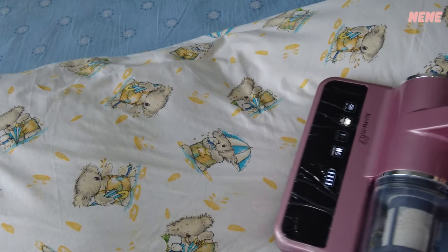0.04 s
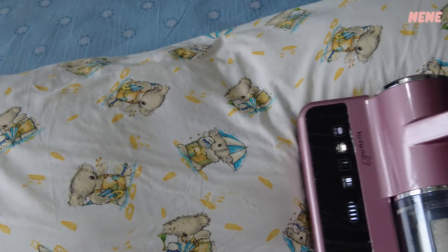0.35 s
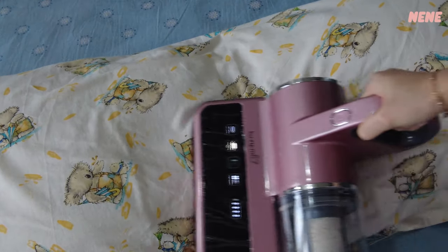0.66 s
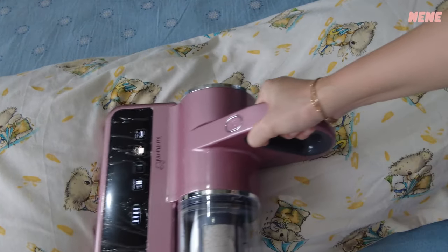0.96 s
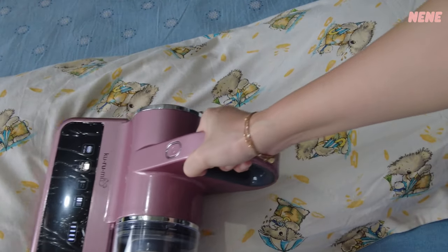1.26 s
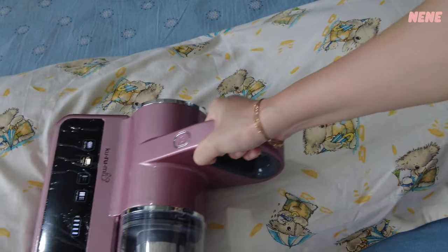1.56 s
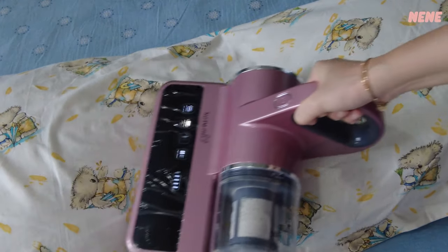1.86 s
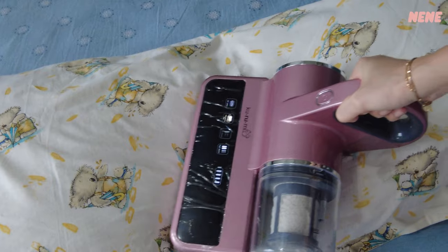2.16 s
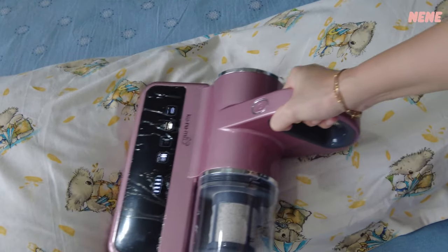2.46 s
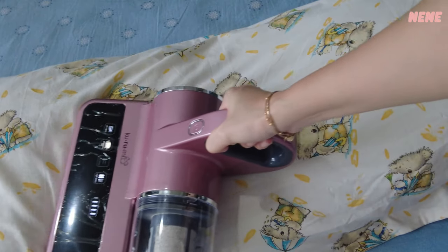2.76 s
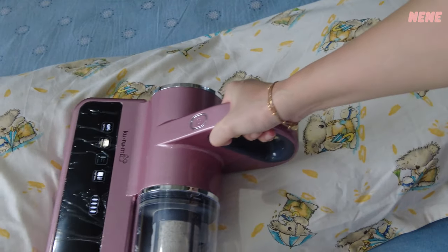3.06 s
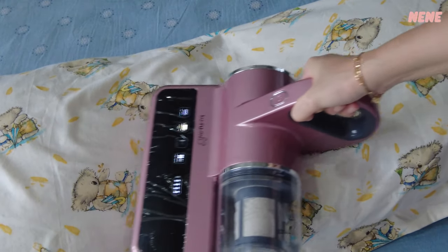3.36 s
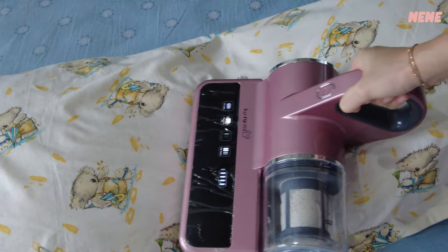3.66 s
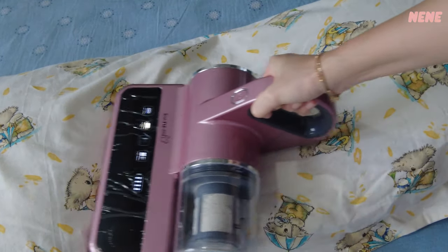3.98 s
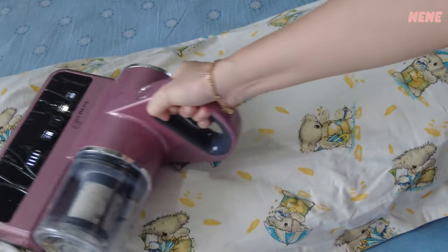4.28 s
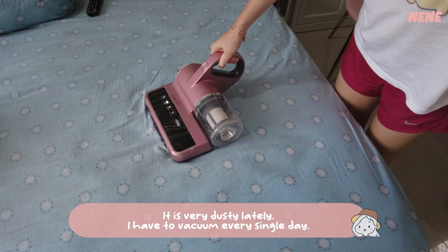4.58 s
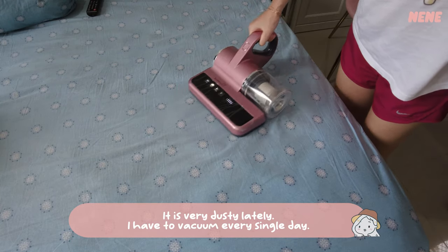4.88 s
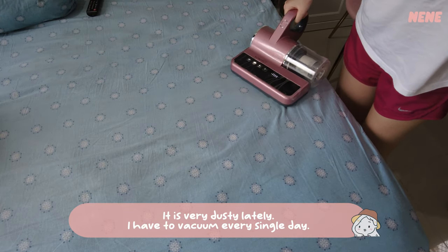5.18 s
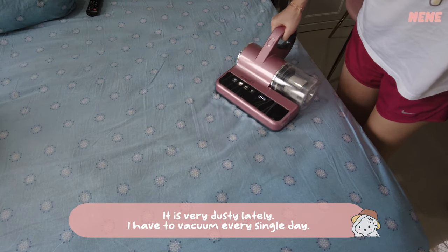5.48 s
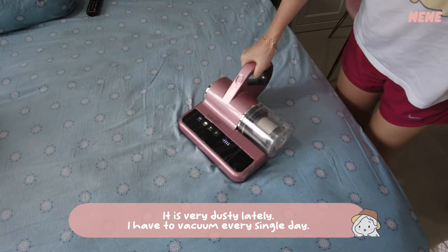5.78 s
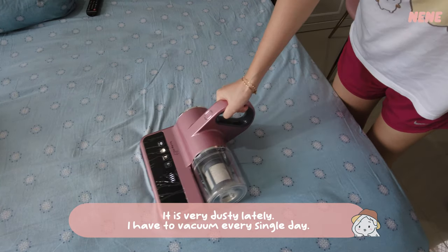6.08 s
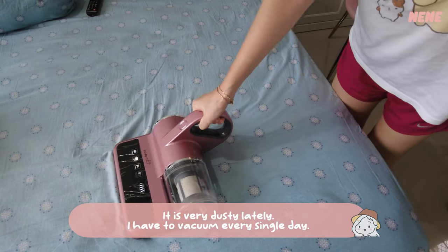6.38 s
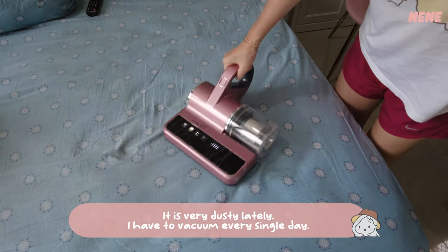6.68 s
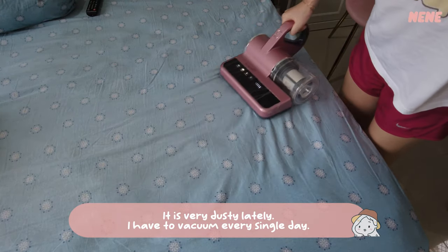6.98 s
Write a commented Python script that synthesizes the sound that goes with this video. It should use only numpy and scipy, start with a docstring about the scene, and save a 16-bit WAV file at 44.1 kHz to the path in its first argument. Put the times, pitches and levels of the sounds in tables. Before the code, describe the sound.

Indoors, air rushes through a handheld bed vacuum as it is pushed over a quilt nearby, the motor whine wavering between left and right. Then comes a sudden switch to a faster, shriller run on a bed sheet, a little quieter and more distant. The pitch rises briefly and levels off, while the hiss swells gently with the strokes and the brush thrums faintly on the mattress.

```python
"""The seven-bladed fan of a handheld bed vacuum whines at its blade-passing frequency, swelling and
fading from ear to ear as it moves through the bedroom's standing waves. The geared brush roller hums,
beats and thrums on the bedding, and air rushes through nozzle, duct and exhaust as broadband noise.
The cleaner is first pushed over a quilt close by; then the scene changes abruptly and it runs up to
a higher speed on a sheet, further off."""
import sys
import numpy as np
from scipy import signal
from scipy.fft import rfft, irfft, next_fast_len
from scipy.io import wavfile
from scipy.ndimage import uniform_filter1d, map_coordinates

SR = 44100
rng = np.random.default_rng(int(sys.argv[2]) if len(sys.argv) > 2 else 0)


def to_wav(s):
    """Save 16-bit WAV."""
    ch = np.atleast_2d(s).T  # columns
    pcm = np.round(np.clip(ch, -1, 1) * 32767)  # PCM
    wavfile.write(sys.argv[1], SR, pcm.astype(np.int16))


N = 310464
TIME_S = np.arange(N) / SR
CHANGE_S = 4.502  # from quilt to sheet
FULL_SPEED_HZ = 835  # shaft speed that the fan approaches on the sheet

# Fan shaft speed: time_s, speed_hz
SHAFT_SPEED_QUILT = [(0, 479), (1.2, 478.8), (1.95, 481.4), (4.48, 481.1)]
# Quick run-up and slow settling on the sheet: initial_deficit_hz, time_constant_s
RUN_UP = [(46, .19), (26, .85)]
# Blade tone in the standing waves: time_s, left_db, right_db, half_interaural_phase_rad
BLADE_QUILT = [(0, -41.5, -45.5, -.7), (.28, -35, -34.5, -0.7), (.45, -38.5, -38, -0.25),
               (.6, -48.5, -43.5, -.2), (.66, -52, -52, 0.2), (.78, -57, -41, -.3), (.97, -44, -50.5, 0),
               (1.04, -46.5, -48, -1.4), (1.13, -51, -53, -1.2), (1.21, -44.5, -42.5, 0.33),
               (1.47, -40, -39.5, 0), (1.62, -43, -44.5, .5), (1.68, -41.5, -52, 1.5),
               (1.78, -43, -44, 1.96), (1.87, -54, -46, 1.9), (1.98, -44, -47, 0.5), (2.1, -49, -50, 1.8),
               (2.2, -44, -50, 2), (2.38, -47, -44, 1.8), (2.45, -57, -42, 1), (2.58, -45, -41, 1.4),
               (2.7, -43, -48, 1), (2.8, -43, -53, 0), (3.1, -43.5, -48.5, .15), (3.35, -44, -49, 1.1),
               (3.46, -44, -55, 1.2), (3.58, -44.5, -45, 1.74), (3.73, -39.5, -39, 2.5),
               (3.88, -43.5, -41.5, 1.85), (3.99, -40.5, -47, 2), (4.08, -38.5, -40, 3.5),
               (4.2, -42, -37, 3.7), (4.28, -48, -40, 4.5), (4.35, -41, -43, 4.8),
               (4.47, -36.5, -51.5, 4.5)]
BLADE_SHEET = [(4.52, -49, -49, 0.3), (4.6, -49, -52, 0), (4.66, -43, -47, 0), (4.77, -46, -48, -1.3),
               (4.85, -55, -55, -0.5), (4.94, -50, -49, -0.1), (5.06, -44, -46, 0.34), (5.18, -56, -57, .2),
               (5.24, -46.5, -46.5, 0.4), (5.32, -41.5, -45, 0.23), (5.43, -54, -43.5, 0),
               (5.48, -45.5, -45.5, -.6), (5.58, -54, -51, -0.5), (5.65, -48, -48, -1.6),
               (5.71, -51, -53, -3), (5.77, -45, -42.5, -3.45), (5.83, -48, -43, -3),
               (5.875, -50, -53, -1.4), (5.94, -40, -44, -0.2), (6.02, -42, -46, 0), (6.1, -46.5, -54, 0.7),
               (6.18, -57, -47, 0.3), (6.25, -49, -46, -.5), (6.34, -55, -57, .3), (6.45, -53, -56, -0.3),
               (6.56, -50, -43.5, -.1), (6.62, -49, -48, -1), (6.7, -46.5, -52, -1), (6.77, -41.5, -49, 0),
               (6.88, -43, -44, 0.2), (6.98, -52, -50, -1.1), (7.04, -49, -44, -1)]
# Hum at the shaft frequency: time_s, relative_level_db
SHAFT_HUM_QUILT = [(0, -55), (.3, -70), (.55, -56.5), (1.4, -58), (2.05, -65), (2.45, -55), (2.75, -58),
                   (2.93, -49), (3.09, -63), (3.24, -49), (3.65, -76), (4.1, -51.5), (4.48, -63)]
# Whistle at the fifth shaft order: time_s, level_db
FIFTH_ORDER_QUILT = [(0, -74), (.6, -67), (.8, -54.5), (.98, -51), (1.15, -63), (1.42, -57), (1.7, -72),
                     (2.03, -53.5), (2.2, -57.5), (2.48, -50.5), (2.65, -56), (2.78, -63), (3.2, -62),
                     (3.56, -51.5), (3.75, -57.5), (4.13, -54), (4.48, -60)]
# Weaker shaft orders: multiple, level_db
ORDERS_QUILT = [(2, -72.5), (10, -67), (14, -77.5), (15, -81), (21, -86), (25, -88)]
# Weaker shaft orders: multiple, full_speed_level_db, growth_db_per_hz
ORDERS_SHEET = [(5, -71, .04), (10, -67.5, 0.2), (14, -78, 0.5), (15, -81, .02)]

# Noise spectra of nozzle, duct, exhaust and the gap under the nozzle: frequency_hz, relative_density_db
NOZZLE_QUILT = [(12, -22), (40, -5.5), (85, -8), (130, -12.5), (200, -7), (280, -4), (340, -2), (520, -1),
                (650, -4), (870, -18), (1200, -9), (2500, -43)]
NOZZLE_SHEET = [(12, -19), (45, 0), (95, 1.5), (120, -3.5), (175, -1), (250, -3.5), (350, -2.5), (430, -6),
                (520, -1.5), (565, -7), (625, 0), (690, -3.5), (770, -.5), (1020, 0), (1250, -4.5),
                (1600, -33)]
DUCT_QUILT = [(700, -42), (1000, -28), (1190, -9.5), (1310, -1.5), (1640, -2), (1900, -8.5), (2280, -15),
              (2480, -9.5), (3000, -7), (3300, -8.5), (3700, -20), (5000, -58)]
DUCT_SHEET = [(1900, -37), (2330, -12), (2470, -4), (2800, 2.5), (3000, -3), (3270, -3), (3340, -6),
              (3520, -8), (3750, -14.5), (4400, -44), (6000, -55)]
EXHAUST_QUILT = [(2000, -43), (3400, -16), (3850, -9), (4350, 1), (4650, -3), (5000, -6.5), (6550, -10.5),
                 (6900, -16), (7600, -15.5), (8500, -19.5), (10000, -24), (13000, -27), (15700, -29)]
EXHAUST_SHEET = [(3000, -19), (4200, -9.5), (4900, -5.5), (5600, 2.5), (6450, -2), (7050, -12), (8900, -8),
                 (9900, -13.5), (10850, -7.5), (11800, -19), (12500, -17), (13300, -28), (15000, -21),
                 (15700, -28)]
GAP_QUILT = [(550, -30), (740, 0), (1100, 0), (1400, -30)]
GAP_SHEET = [(700, -34), (1200, 1.5), (1650, 1.5), (1950, -1.5), (2300, -0.5), (3500, -37)]
# Air leaking under the nozzle on the quilt: time_s, level_db
GAP_LEVEL = [(.2, -60), (.9, -67), (1.55, -72), (1.95, -60), (2.5, -60), (2.95, -64), (3.4, -61),
             (4.48, -61)]
# Hollow lower resonance of the duct on the quilt: time_s, relative_level_db
HOLLOW_LEVEL = [(0, -45), (1.0, -43.5), (1.73, -40.5), (2.15, -44), (2.9, -45.5), (3.15, -42.5),
                (3.55, -47), (4.48, -46)]
# Rush of air on the sheet, swelling twice, loudest midway through the second stroke:
# time_s, relative_level_db
FLOW_SHEET = [(4.52, -54), (4.75, -52.5), (5.05, -53.3), (5.38, -50), (5.8, -51), (6.3, -51), (6.62, -48),
              (6.85, -52.5)]
# Likeness of the noise at the two ears: frequency_hz, correlation
COHERENCE_QUILT = [(60, 1), (130, 0.97), (290, 0.97), (640, 0.42), (1410, 0.74), (3100, 0.52), (6820, 0.32),
                   (15000, 0.85)]
COHERENCE_SHEET = [(60, 0.79), (130, 1), (290, 0.96), (640, 0.94), (1410, 0.36), (3100, 0.89), (6820, 0.34),
                   (15000, 0.61)]

# Two close gear tones of the roller drive: upper_hz, lower_hz
GEAR_HZ = [1267, 1246]
# The gear tones take turns, and growl where equally loud: time_s, upper_db, lower_db
GEAR_LEVEL = [(0, -51.5, -59), (.35, -47, -59), (.73, -43, -59), (1.0, -51, -55), (1.45, -46, -49),
              (1.7, -48.5, -55), (1.82, -58, -57), (1.97, -55, -52.5), (2.2, -49.5, -52.5),
              (2.55, -60, -50.5), (2.8, -55.5, -57), (3.03, -50.5, -56), (3.3, -59, -59),
              (3.55, -54, -51.5), (3.8, -50, -47), (3.95, -60, -48.5), (4.25, -49.5, -52.5),
              (4.48, -55, -52.5)]
# Tones of the roller and its drive (on the sheet, at full load): pitch_hz, level_db
ROLLER_QUILT = [(306.8, -64.5), (1335, -61.5), (1610, -63)]
ROLLER_SHEET = [(2159, -77), (2529, -61.5), (2767, -65), (3004, -64.5)]
# Low hum of the spinning brush: pitch_hz, level_db
BRUSH_HUM_SHEET = [(142, -65), (198, -72.5)]
# The brush beating the soft quilt: time_s, relative_level_db
PATTER_LEVEL = [(.15, -69), (.38, -55), (.95, -60.5), (1.4, -63.5), (1.7, -63), (2.1, -65), (3, -69),
                (3.45, -57.5), (3.8, -70)]
# Spectrum of that patter: frequency_hz, relative_density_db
PATTER_SPECTRUM = [(30, -33), (60, -25), (75, 9.5), (100, 6), (130, -12), (250, -53)]
# The brush drums on the mattress while it bears down: start_s, length_s, pitch_hz, level_db
THRUMS = [(4.4, 1.41, 57, -64.5), (6.17, .8, 81.4, -58.5)]
# A faint rubbing tone climbs during each stroke: start_s, length_s, start_pitch_hz, level_db
RUBS = [(5.206, 0.67, 228, -71), (6.154, 0.95, 232, -70)]


def fan(shaft_hz, blade_path, hum_db, orders, blade_trim_db, flutter):
    """Rotor harmonics: the blade-passing tone and the weaker orders are multiples of the shaft speed."""
    left_db, right_db, lead = curves(blade_path)
    blade_db = np.array([left_db, right_db]) + blade_trim_db
    whine = tone(7 * shaft_hz, blade_db, flutter, roam=0.074, lead=lead)
    whine += tone(shaft_hz, hum_db, flutter=0.29, roam=0.27)
    for multiple, db in orders:
        whine += tone(multiple * shaft_hz, db, flutter=0.18, roam=0.3, fade_db=2.6)
    return whine


def quilt_fan():
    """Beating: a faint neighbour makes the slow fan's blade tone flutter; the fifth order whistles."""
    shaft_hz, = curves(SHAFT_SPEED_QUILT)
    hum_db, = curves(SHAFT_HUM_QUILT)
    fifth_db, = curves(FIFTH_ORDER_QUILT)
    beat_hz = 16.5
    whine = fan(shaft_hz, BLADE_QUILT, hum_db - 2.5, ORDERS_QUILT, blade_trim_db=-0.2, flutter=0.08)
    whistle = tone(5 * shaft_hz, fifth_db, flutter=0.13, roam=0.2)
    neighbour = tone(7 * shaft_hz + beat_hz, db=-58, flutter=0.082, roam=0.42)
    return whine + whistle + neighbour


def sheet_fan(shaft_hz):
    """Resonance: the fast, shrill fan hums as its shaft speed passes through a mode of the housing."""
    housing_hz, half_width_hz = 801, 16
    hum_db = -58 - 10 * np.log10(1 + ((shaft_hz - housing_hz) / half_width_hz) ** 4)
    orders = [(multiple, db + growth * (shaft_hz - FULL_SPEED_HZ))
              for multiple, db, growth in ORDERS_SHEET]
    return fan(shaft_hz, BLADE_SHEET, hum_db, orders, blade_trim_db=0.1, flutter=0.14)


def sheet_shaft_speed():
    """Exponential approach to full speed; the nozzle seals briefly and the unloaded fan speeds up."""
    elapsed_s = np.maximum(TIME_S - CHANGE_S, 0)
    deficit_hz = sum(hz * np.exp(-elapsed_s / tau_s) for hz, tau_s in RUN_UP)
    seal_at_s, seal_width_s, seal_rise_hz = 6.75, 0.14, 3
    seal = np.exp(-((TIME_S - seal_at_s) / seal_width_s) ** 2)
    return FULL_SPEED_HZ - deficit_hz + seal_rise_hz * seal


def quilt_air():
    """Flow noise shaped by resonance: a close rush in which the duct's hollow note comes and goes."""
    flow_db = swing_db(HOLLOW_LEVEL)
    gap_db, = curves(GAP_LEVEL)
    duct = rush(DUCT_QUILT, COHERENCE_QUILT, ripple_db=3.5)
    hollow = filtered(duct, lambda hz: 1 / (1 + (hz / 2200) ** 20))  # the duct's lower resonance
    air = amp(-51 + 0.88 * wobble(6.16)) * rush(NOZZLE_QUILT, COHERENCE_QUILT, ripple_db=2.5)
    air += amp(gap_db) * rush(GAP_QUILT, COHERENCE_QUILT, ripple_db=2.5)
    air += amp(flow_db - 44) * hollow
    air += amp(-43 + 0.43 * wobble(3.9)) * (duct - hollow)
    exhaust_gain = air_gain(flow_db, db=-53, follows=0.17, drift_db=0.5)
    return air + exhaust_gain * rush(EXHAUST_QUILT, COHERENCE_QUILT, ripple_db=2)


def sheet_air():
    """Flow noise, thinner and brighter; the gap hisses louder once the head is pushed over the bed."""
    flow_db = swing_db(FLOW_SHEET)
    opens_at_s, opening_s = 5.44, 0.63
    opened = np.clip((TIME_S - opens_at_s) / opening_s, 0, 1)

    def layer(spectrum, db, follows, drift_db, ripple_db):
        return air_gain(flow_db, db, follows, drift_db) * rush(spectrum, COHERENCE_SHEET, ripple_db)

    air = layer(NOZZLE_SHEET, db=-57.5, follows=0.4, drift_db=1, ripple_db=3.5)
    air += layer(DUCT_SHEET, db=-51, follows=0.94, drift_db=0.7, ripple_db=4)
    air += layer(EXHAUST_SHEET, db=-53.5 + 0.89 * opened, follows=0.33, drift_db=0.5, ripple_db=2.5)
    return air + layer(GAP_SHEET, db=-67 + 4 * opened, follows=0.2, drift_db=1.3, ripple_db=3.5)


def air_gain(flow_db, db, follows, drift_db):
    """Power law: noise amplitude grows as the flow to the power `follows`, with a slight random drift."""
    return amp(db + follows * flow_db + drift_db * wobble(4.09))


def quilt_brush():
    """Forced vibration: the brush patters on the soft quilt, a low rumble around one tone."""
    patter_db, = curves(PATTER_LEVEL)
    rumble = amp(patter_db - 3) * rush(PATTER_SPECTRUM, COHERENCE_QUILT, ripple_db=1)
    return rumble + tone(hz=70, db=patter_db - 4.5, flutter=0.15, roam=0.05)


def gears():
    """Beating: two close gear tones interfere at their difference frequency."""
    drag = 1 + 0.0008 * wobble(4)  # the cloth slows the roller unevenly
    return sum(tone(hz * drag, db, flutter=0.15, roam=0.32)
               for hz, db in zip(GEAR_HZ, curves(GEAR_LEVEL)))


def roller(tones):
    """Frequency modulation: the brush drive's tones waver with the drag of the cloth."""
    return sum(tone(hz * (1 + 0.001227 * wobble(4)), db, flutter=0.3, roam=0.079, fade_db=3.5)
               for hz, db in tones)


def sheet_brush(shaft_hz):
    """Forced vibration and friction: the humming brush drums on the mattress and rubs the sheet."""
    thrum = sum(contact(start_s, length_s) * tone(hz, db, flutter=0.14, roam=0.05, fade_db=1)
                for start_s, length_s, hz, db in THRUMS)
    rub = np.zeros((2, N))
    climb_hz_per_s = 115
    for start_s, length_s, start_hz, db in RUBS:
        pitch_hz = start_hz + climb_hz_per_s * (TIME_S - start_s)
        rub += contact(start_s, length_s) * tone(pitch_hz, db, flutter=0.22, roam=0.11)
    # as the fan gains speed it pulls the cloth onto the brush, and the loaded drive grows louder
    load = (shaft_hz / FULL_SPEED_HZ) ** 9
    return thrum + rub + roller(BRUSH_HUM_SHEET) + load * roller(ROLLER_SHEET)


def contact(start_s, length_s, grip_s=0.1):
    """Trapezoidal envelope of one touch of the brush: it grips, holds and lets go."""
    age_s = TIME_S - start_s
    return np.clip(np.minimum(age_s, length_s - age_s) / grip_s, 0, 1)


def tone(hz, db, flutter, roam, fade_db=0, lead=0):
    """Random modulation: turbulence shakes a stereo tone fast; shifting room paths turn and fade it."""
    cycles = np.cumsum(hz * np.ones(N)) / SR
    phase = 2 * np.pi * (cycles - np.floor(cycles)) + flutter * wobble(70)
    level = np.sqrt(2) * amp(db + fade_db * wobble(3.017)) * (1 + flutter * wobble(90))
    apart_rad = lead + roam * wobble(4.04)  # half the phase angle between the ears
    ear_phases = np.array([phase + apart_rad, phase - apart_rad], dtype=np.float32)
    return level.astype(np.float32) * np.sin(ear_phases)


def rush(spectrum, coherence, ripple_db):
    """Interference: reflections ripple the spectrum of stereo noise (rms 1) as the cleaner moves."""
    noise_bins = signal.stft(rng.standard_normal((2, N)), nperseg=2048)[2]
    ripples = uniform_filter1d(rng.standard_normal(noise_bins.shape[1:]), size=2, axis=0)  # narrow
    ripples = uniform_filter1d(ripples, size=30, axis=1)  # slowly drifting
    noise = signal.istft(noise_bins * amp(ripple_db * unit(ripples)), nperseg=2048)[1][:, :N]

    def mid_side_response(hz):
        width_rad = np.arccos(np.clip(along(coherence, hz), -1, 1)) / 2
        return amp(along(spectrum, hz)) * [np.cos(width_rad), np.sin(width_rad)]

    mid, side = filtered(noise, mid_side_response)
    return unit(np.array([mid + side, mid - side]))


def wobble(rate_hz):
    """Band-limited randomness: a smooth curve through rate_hz random knots a second."""
    knots = rng.standard_normal(int(N * rate_hz / SR) + 4)
    hop = 64
    coarse = map_coordinates(knots, [np.arange(0, N + hop, hop) * rate_hz / SR]).astype(np.float32)
    ramp = np.arange(hop, dtype=np.float32) / hop
    return (coarse[:-1, None] + np.diff(coarse)[:, None] * ramp).ravel()[:N]


def filtered(x, response):
    """Linear filtering: the spectrum of x is multiplied by a frequency response."""
    size = next_fast_len(N + SR // 4)
    return irfft(rfft(x, size) * response(np.fft.rfftfreq(size, 1 / SR)), size)[..., :N]


def curves(rows):
    """Linear interpolation in time: one value per sample for each column after the first."""
    times_s, *columns = np.transpose(rows)
    return [np.interp(TIME_S, times_s, column) for column in columns]


def swing_db(rows):
    """Relative level: a curve in dB about the mean of its points."""
    return curves(rows)[0] - np.mean(rows, axis=0)[1]


def along(points, hz):
    """Interpolation of (frequency_hz, value) points on a logarithmic frequency axis."""
    points_hz, values = np.transpose(points)
    return np.interp(np.log(hz + 1), np.log(points_hz + 1), values)


def amp(db):
    """The decibel law: 20 dB is a tenfold amplitude."""
    return np.exp(np.asarray(db) * (np.log(10) / 20))


def unit(x):
    """Normalisation to rms 1."""
    return x / np.sqrt(np.mean(x ** 2) + 1e-20)


def scene():
    """Superposition: air, fan and brush add, first on the quilt and then on the sheet."""
    on_quilt = quilt_air() + quilt_fan() + quilt_brush() + gears() + roller(ROLLER_QUILT)
    shaft_hz = sheet_shaft_speed()
    on_sheet = sheet_fan(shaft_hz) + sheet_air() + sheet_brush(shaft_hz)
    balance = amp([[0.2], [-0.2]])  # slightly to the left
    return np.where(TIME_S < CHANGE_S, on_quilt, on_sheet) * balance


def record(dry):
    """Band limiting: an ideal low-pass filter removes the highest treble."""
    return filtered(dry, lambda hz: hz < 15720)


dry = scene()
out = record(dry)
to_wav(out)
```